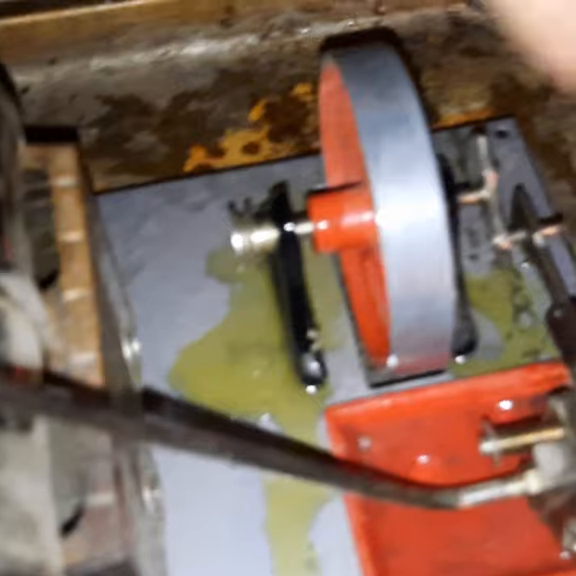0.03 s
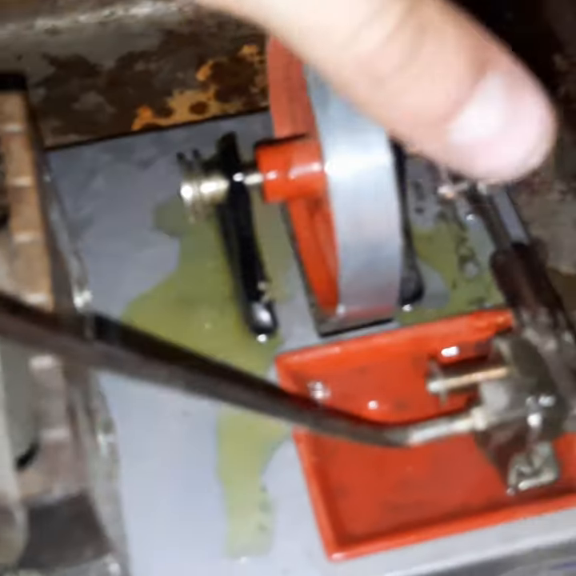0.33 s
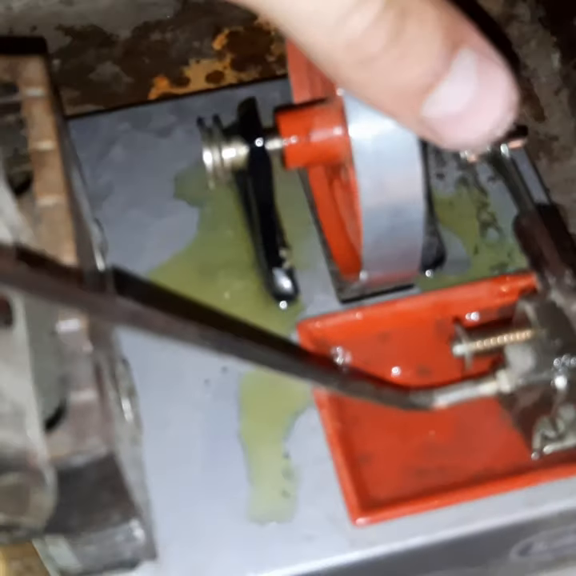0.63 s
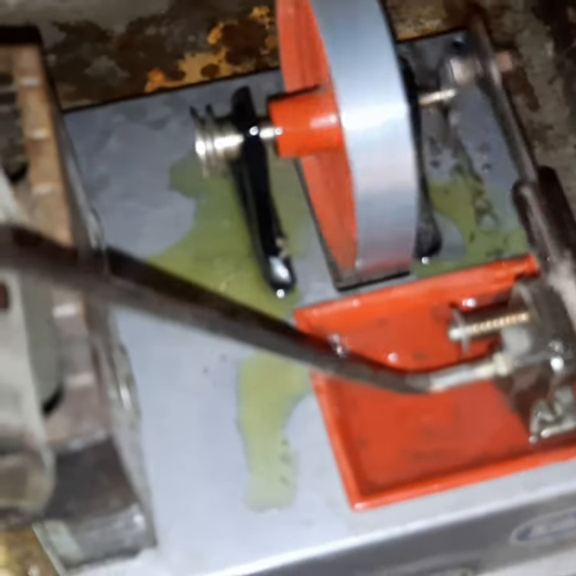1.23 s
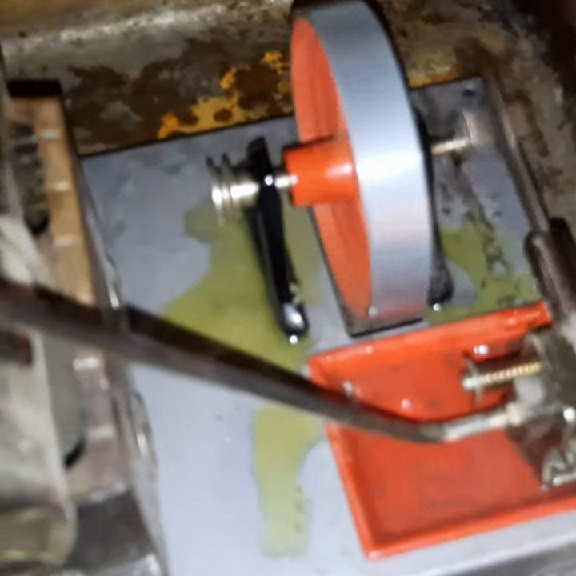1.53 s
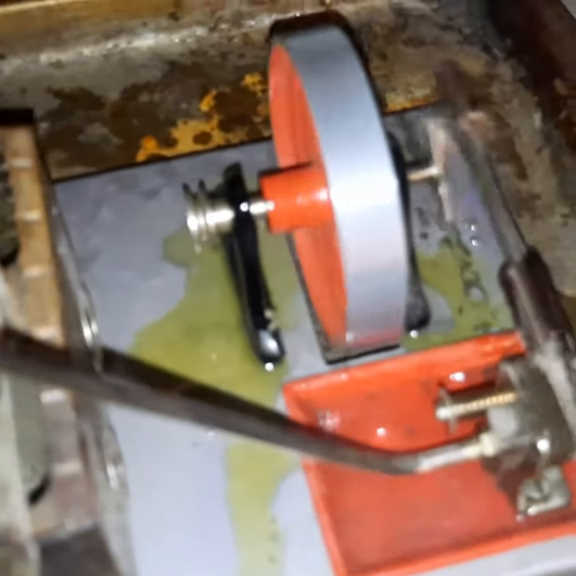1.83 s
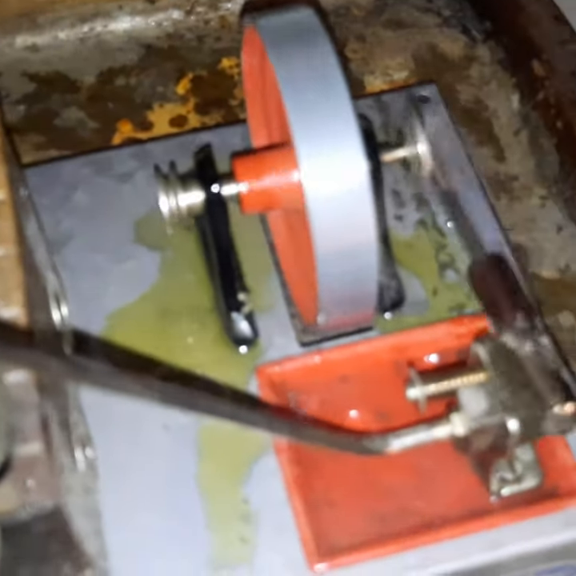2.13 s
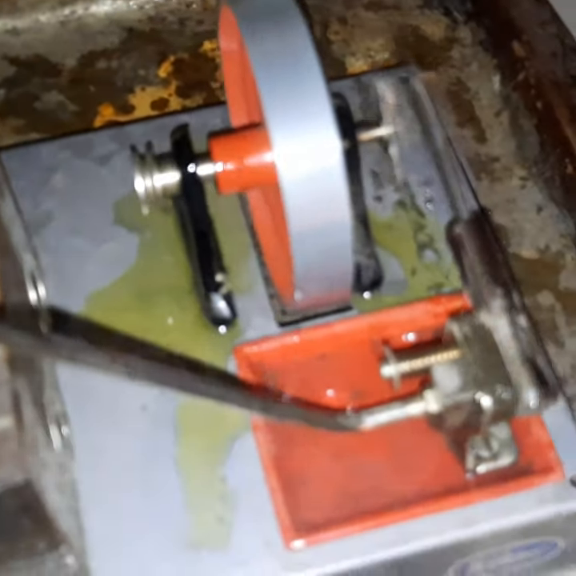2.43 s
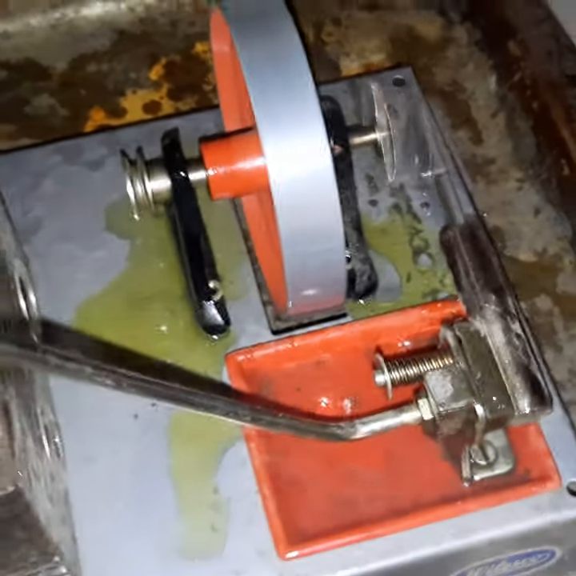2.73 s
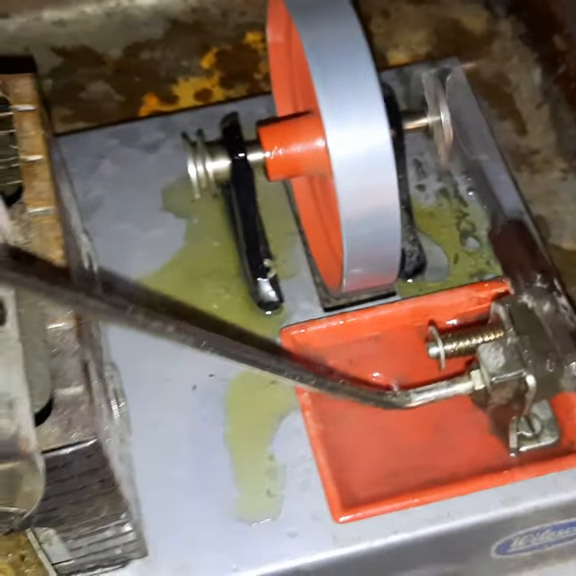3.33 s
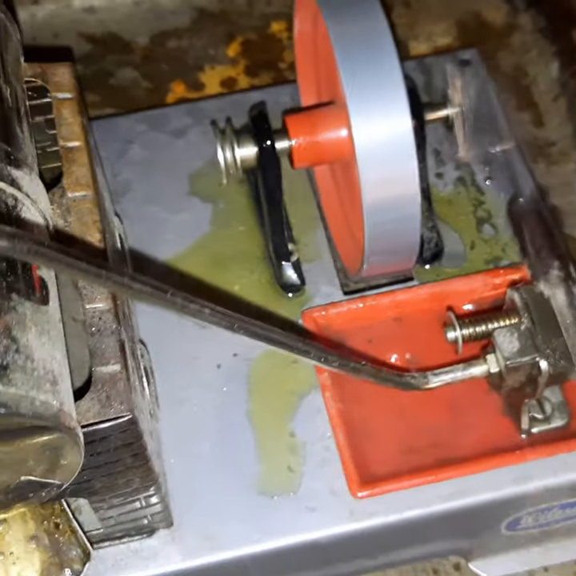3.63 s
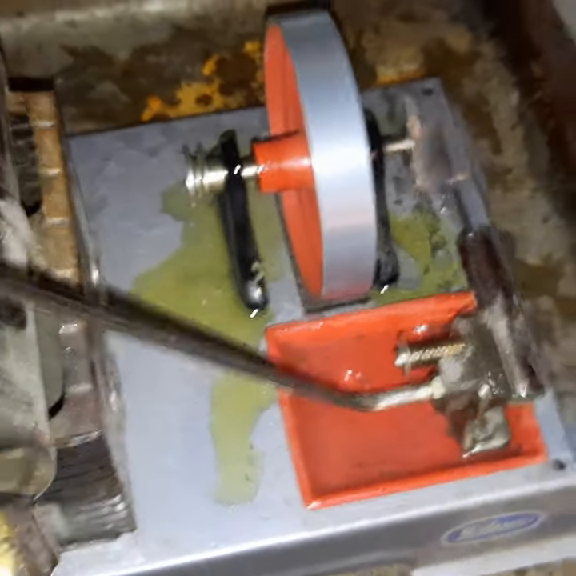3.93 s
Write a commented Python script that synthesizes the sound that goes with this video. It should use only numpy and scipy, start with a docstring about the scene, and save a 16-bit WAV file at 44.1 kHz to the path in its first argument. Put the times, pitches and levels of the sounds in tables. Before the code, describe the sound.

A small toy steam engine, heard close indoors, goes from quiet seeping steam to spitting chuffs and a clacking crank. The rhythm quickens steadily, ending in fast hissing puffs while its base rattles and drones against a metal basin.

```python
"""A faint hiss, a motor's hum and the tick of a finger, then a toy steam engine is flicked into motion,
close up in a metal basin, and races up to 34 turns a second. Every turn brings a wet chuff, a weak leak
of steam, a light tap and a bouncing clack of the loose crank, which thumps the base. Water squirts on
the first strokes. With speed the clack comes later in the turn and melts into the rattle and drone of
the shaking base."""
import sys
import numpy as np
from scipy import signal
from scipy.fft import rfft, irfft
from scipy.io import wavfile

SR = 44100
rng = np.random.default_rng(int(sys.argv[2]) if len(sys.argv) > 2 else 0)


def write(x):
    x = np.atleast_2d(x).T
    wavfile.write(sys.argv[1], SR, np.round(np.clip(x, -1, 1) * 32767).astype(np.int16))


N = 176400
RELEASE_S, PORT_OPEN_S = 1.2, 2.782  # the finger lets go; a moment when the crank is at angle zero

# run-up of the flywheel: time_s, turns_per_s
SPEED = [(1.2, 2.599), (1.45, 6.37), (1.7, 9.662), (2.0, 13.804), (2.4, 19.353), (2.8, 24.58),
         (3.2, 28.703), (3.6, 31.814), (4.0, 34.264)]
# steam at the peak of a puff: time_s, chuff_db, leak_db
PUFF_LEVELS = [(1.1, -66, -58), (1.22, -45, -49), (1.36, -28.5, -43), (1.47, -28, -32), (1.53, -21, -41),
               (1.65, -22.5, -50), (1.85, -21, -37), (2.3, -14.5, -37), (2.6, -15, -34), (2.8, -12.5, -29),
               (3.2, -14, -43), (3.7, -16.5, -45), (4.0, -15.5, -28)]
# colour of the chuff at low, high and full speed: freq_hz, level_db
SLOW_CHUFF = [(500, -35), (2000, -19.5), (5000, -9), (5800, 0), (6450, 1), (7300, 1.5), (7900, -10.5),
              (8300, 4), (8800, -17.5), (11000, -9.5), (13500, -14.5), (15600, -23)]
FAST_CHUFF = [(500, -21), (2000, -34), (4000, -13.5), (5600, -5.5), (6800, -3), (7300, 2), (7550, 8),
              (7800, 10), (8050, 4), (8450, -0.5), (8900, -13.5), (10300, -12.5), (12500, -8), (14000, -15),
              (15600, -18)]
RACING_CHUFF = [(500, -11), (2000, -1.5), (4000, -6.5), (5000, 0.5), (6500, -1), (8300, 4.5), (9000, -15),
                (10300, -5), (12500, -2), (14000, -7), (15600, -22)]
# speed at which each of those colours plays alone: turns_per_s
CHUFF_SPEEDS = [9, 23, 31.5]
# a faint tick of a finger touching the engine, then light taps of the crank: start_s, level_db
TICK_AND_TAPS = [(0.161, -50.5), (1.408, -35), (1.5545, -30.5), (1.6716, -26.5), (1.772, -26.5),
                 (1.8614, -27), (1.9434, -26.5), (2.0163, -24.5), (2.086, -21.5), (2.1509, -23),
                 (2.2112, -23), (2.269, -28), (2.3248, -25), (2.379, -28), (2.4292, -26), (2.4792, -27),
                 (2.5278, -30), (2.5763, -30), (2.618, -30), (2.664, -27), (2.7073, -31), (2.7508, -27),
                 (2.7904, -37)]
# clacks of the crank: start_s, ring_db, hardness (0-1), crack_db
CLACKS = [(1.4426, -33, 0.54, -37.5), (1.5812, -25, 0.27, -39), (1.695, -19, 0.2, -29),
          (1.7927, -18.5, 1, -26.5), (1.879, -19.5, 1, -27), (1.9596, -18, 0.94, -26.5),
          (2.0322, -18.5, 0.7, -26.5), (2.0998, -16, 0.8, -28.5), (2.1644, -21.5, 0.7, -27.5),
          (2.2251, -16, 0.95, -27), (2.2833, -18, 0.94, -29), (2.3399, -17.5, .8, -25.5),
          (2.392, -20, 0.55, -29), (2.4443, -20.5, 0.34, -27), (2.4938, -22.5, 0.05, -28),
          (2.5411, -22.5, 0, -27), (2.5867, -24, .25, -27), (2.6309, -25.5, 0.1, -31),
          (2.6762, -23, 0.4, -29), (2.7189, -17, 0.53, -31), (2.7607, -21, 0.7, -48),
          (2.8017, -22, 0.7, -29.5), (2.843, -23, 1, -29.5), (2.884, -23.5, 0.5, -29.5),
          (2.9222, -23.5, 0.9, -27), (2.9651, -23, 0.6, -34), (2.9995, -28, 0.8, -33),
          (3.0358, -22, 0.8, -30), (3.0767, -27, 0.9, -26), (3.1137, -29, 0.5, -27.5),
          (3.1449, -29, .7, -26), (3.1851, -32, 0.8, -20), (3.217, -26, 0.4, -29), (3.2927, -28, 1, -27),
          (3.3265, -24, 1, -28), (3.359, -19.5, 0.84, -26), (3.3944, -25.5, .8, -26),
          (3.424, -24, .7, -28.5)]
# a blow and its two bounces: delay_s, level_db
BOUNCES = [(0, 1), (.0024, -12.5), (.0056, -7.5)]
# ring of the crank and frame: pitch_hz, hard_blow_db, t60_s, soft_blow_db
FRAME_MODES = [(770, -23, 0.055, -25.5), (1022, -4, 0.02, -8), (1130, 0, 0.015, 1),
               (1240, -2.5, 0.017, -4.5), (1624, -0.5, 0.02, -8.5), (1760, 2.5, 0.02, -9.5),
               (1848, 3, 0.023, -35), (2030, -4, .021, -21), (2140, -8.5, 0.029, -32),
               (2725, -14, 0.016, -31), (3720, -15, 0.015, -36), (4420, -21, 0.021, -28)]
# colour of the crack on each clack: freq_hz, level_db
CRACK_COLOUR = [(400, 3), (1500, -1), (2700, 0), (3500, -3.5), (5000, 3.5), (6200, -6.5), (8200, -9),
                (9500, -17), (13000, -14.5), (15600, -39)]
# how long after the chuff the crank loads the base: time_s, lag_turns
CLACK_LAG = [(1.44, .45), (1.9, .462), (2.28, .482), (2.42, .525), (2.8, .53), (3.0, .63), (3.2, .74),
             (3.55, .91), (4.0, .95)]
# ring of the base in the basin: pitch_hz, level_db, t60_s
BASE_MODES = [(96.7, -16, 0.28), (121.8, 1, 0.2), (158.4, 0.5, 0.13), (202.3, -3.5, 0.093),
              (244, -14.5, 0.17), (313.2, 6, 0.097), (421, -11.5, 0.17), (463, -6.5, 0.094), (620, -8, 0.1)]
# mean levels of the shaking base: time_s, thump_db, rattle_db
SHAKE_LEVELS = [(1.1, -58, -67), (1.25, -50, -58), (1.45, -37.5, -52), (1.65, -34, -44), (1.85, -29, -41),
                (2.3, -29, -32), (2.7, -28, -39.5), (2.9, -29, -29.5), (3.1, -27.5, -28.5), (3.4, -42, -24),
                (3.58, -44, -26), (3.7, -44, -25.5), (4.0, -44, -23.5)]
# colour of the rattle: freq_hz, level_db
RATTLE_COLOUR = [(60, -8.5), (130, -2.5), (310, -1), (500, -4), (730, -3.5), (1150, 0.5), (1500, -1),
                 (1900, -1.5), (2600, -7), (3600, -13.5), (5000, -23.5), (8000, -30), (9500, -37),
                 (13000, -31), (15600, -19)]
# partials of the drone: cycles_per_turn
DRONE_MULTIPLES = [3, 4, 5, 6, 7, 10, 11, 14]
# swell of the drone: time_s, then one level_db for each partial
DRONE_LEVELS = [(2.5, -45, -45, -31, -53, -44, -63, -58, -56),
                (2.8, -54, -49, -26.5, -50, -38, -48, -37, -48),
                (3.02, -52, -43, -24.5, -33, -40, -31, -38.5, -42),
                (3.28, -49, -30.5, -27, -38, -28, -33, -35.5, -37.5),
                (3.55, -29, -31.5, -25, -36, -71, -28, -55, -38.5),
                (3.72, -32.5, -31.5, -37, -34.5, -40, -37, -46, -44),
                (4.0, -27, -28.5, -37, -48, -54, -49, -48, -50)]
# squirts of condensed water: start_s, length_s, start_hz, end_hz, level_db
SQUIRTS = [(1.209, 0.022, 6300, 6650, -43.5), (1.226, 0.054, 3880, 5230, -45.5),
           (1.235, .04, 13100, 14800, -48), (1.296, .022, 7000, 9100, -47), (1.455, 0.027, 5500, 8130, -43),
           (1.59, 0.023, 5880, 7970, -33.5)]
# groan of the bearing at low speed: time_s, level_db
GROAN_LEVELS = [(.9, -83), (1.05, -49.5), (1.16, -38), (1.28, -56), (1.45, -44), (1.7, -59), (2.0, -65)]
# seeping steam and rubbing shaft: time_s, hiss_db, rub_db
HISS_RUB_LEVELS = [(.1, -55, -55.5), (.7, -55.5, -54), (.95, -51, -45.5), (1.15, -48.5, -42.5),
                   (1.3, -47, -37.5), (1.8, -40.5, -33), (2.6, -37, -30.5), (4.0, -29.5, -44)]
# colours of shaft, seeping steam, sizzling drops and room: freq_hz, level_db
RUB_COLOUR = [(45, -53.5), (58, -5), (85, -10.5), (125, 6), (200, -12.5), (290, 0), (380, -6.5), (550, -23),
              (1000, -11.5), (1600, -31.5), (5000, -45)]
HISS_COLOUR = [(1000, 4), (2500, 0), (4800, -0.5), (6100, 2), (7300, -4), (8000, -0.5), (9800, -11),
               (13200, -4), (15600, -17)]
SIZZLE_COLOUR = [(9500, -25), (12700, 2), (15000, -17)]
ROOM_COLOUR = [(40, 9), (60, -8), (85, -2.5), (150, -2), (190, -8), (290, -0.5), (370, -9.5), (480, -12),
               (600, -21.5), (850, -8.5), (1250, -35), (3000, -28), (8000, -58)]
# hum of the motor: harmonic_number, level_db
HUM_PARTIALS = [(1, -56.5), (2, -83), (5, -57.5), (6, -60.5), (14, -81), (15, -63), (16, -63.5), (17, -66),
                (18, -68.5), (19, -64)]
# stereo tilt of the microphone: freq_hz, left_minus_right_db
BALANCE = [(60, 2.5), (300, 3.5), (700, 4.5), (1300, 1.5), (2400, 3.5), (4400, -0.5), (5600, -0.5),
           (6500, -6.5), (7700, -3), (9000, 4.5), (12500, 8), (16000, 13.5)]


def steam(t, turns, rise_turns=.044, decay_turns=.07, spit_db=4, scatter_db=.86):
    """A spitting chuff as the port opens and a leak on the other stroke, changing colour with speed."""
    def past(place):
        return (turns - place + .5) % 1 - .5

    opened = past(-.02)  # the chuff peaks just ahead of angle zero
    chuff = np.exp(np.where(opened < 0, -.5 * (opened / rise_turns) ** 2, -opened / decay_turns))
    leak = np.exp(-.5 * (past(.637) / .056) ** 2)  # a soft swell later in the turn
    spit = undb(spit_db * np.repeat(rng.standard_normal(N // 32 + 1), 32)[:N])
    jet = rng.standard_normal(N) * spit / np.sqrt(np.mean(spit ** 2))
    stroke = np.round(turns - np.floor(turns[0])).astype(int)
    accent_db = scatter_db * rng.standard_normal(N // 100)[stroke]
    puffs = chuff * undb(curve(PUFF_LEVELS, t) + accent_db) + leak * undb(curve(PUFF_LEVELS, t, 2))
    flow = jet * (t > RELEASE_S) * puffs
    shares = (np.interp(curve(SPEED, t), CHUFF_SPEEDS, row) for row in np.eye(3))
    colours = (SLOW_CHUFF, FAST_CHUFF, RACING_CHUFF)
    return sum(through(flow * share, unit(response(colour))) for share, colour in zip(shares, colours))


def finger_and_crank(t, crack_decay_s=.0033):
    """A finger ticks the frame, then the loose crank taps and clacks; hard hits ring higher modes."""
    times, ring_db, hardness, crack_db = np.array(CLACKS).T
    light_hits = bouncing(*np.array(TICK_AND_TAPS).T)
    clack = bouncing(times, ring_db)
    hard = np.interp(t, times, hardness)
    fade = np.exp(-np.arange(SR // 30) / SR / crack_decay_s)
    crack_power = np.abs(through(bouncing(times, crack_db) ** 2, fade / fade.sum()))
    crack = np.sqrt(crack_power) * noise(CRACK_COLOUR)
    bright = ring([(hz, db, t60) for hz, db, t60, _ in FRAME_MODES])
    dull = ring([(hz, db, t60) for hz, _, t60, db in FRAME_MODES])
    return crack + through(clack * hard, bright) + through(light_hits + clack * (1 - hard), dull)


def bouncing(times, db, timing_scatter=.151, scatter_db=.38):
    """Each blow is followed by two uneven bounces."""
    out = 0
    for delay, bounce_db in BOUNCES:
        late, hard = rng.standard_normal((len(times), 2)).T
        landings = times + delay * (1 + timing_scatter * late)
        out += knocks(landings, db + bounce_db + scatter_db * hard)
    return out


def thumps(delay_s=.00719, softness_s=.00086):
    """Each clack gives the base a cushioned push that rings its low modes."""
    times = np.array(CLACKS)[:, 0]
    push = blows(times + delay_s, curve(SHAKE_LEVELS, times))
    push += knocks(np.array([1.24]), db=-34)  # the base settles as the finger lets go
    cushion = np.exp(-np.arange(SR // 50) / SR / softness_s)
    return through(push, unit(signal.fftconvolve(ring(BASE_MODES), cushion)))


def rattle(t, clack_turns, contacts_per_s=2500, scatter_db=4.5, swing_db=2, lag_turns=.12):
    """The base chatters against the basin, surging just after the crank loads it."""
    contacts = (rng.random(N) < contacts_per_s / SR) * rng.choice([-1, 1], N)
    contacts = contacts * undb(scatter_db * rng.standard_normal(N))
    chatter = contacts / np.std(contacts) + undb(-3) * buzz(clack_turns)
    surge_db = swing_db * np.cos(2 * np.pi * (clack_turns - lag_turns))
    return through(chatter * undb(curve(SHAKE_LEVELS, t, 2) + surge_db), unit(response(RATTLE_COLOUR)))


def buzz(clack_turns, count=24, jitter_s=.00008):
    """Some contacts of the rattle recur at the same angles on every turn."""
    out = 0
    for angle in (np.arange(count) + rng.random(count)) / count:
        turns = clack_turns - angle
        times = np.interp(np.arange(np.ceil(turns[0]), turns[-1]), turns, np.arange(N) / SR)
        out += rng.choice([-1, 1]) * blows(times + jitter_s * rng.standard_normal(len(times)), 0)
    return out / np.sqrt(count)


def drone(t, clack_turns, fade_in_s=2):
    """The unbalanced flywheel rocks the base, which drones at multiples of its speed."""
    out = 0
    for column, multiple in enumerate(DRONE_MULTIPLES, 1):
        partial = np.sin(2 * np.pi * (multiple * clack_turns + rng.random()))
        out += undb(curve(DRONE_LEVELS, t, column)) * partial
    return np.clip((t - RELEASE_S) / fade_in_s, 0, 1) * np.sqrt(2) * out


def squirts(t, half_width_hz=670):
    """Water leaves the cold cylinder in narrow hisses that glide upward."""
    fizz = signal.sosfilt(signal.butter(2, half_width_hz, fs=SR, output="sos"), rng.standard_normal(N))
    out = 0
    for start, length, low, high, db in SQUIRTS:
        progress = np.clip((t - start) / length, 0, 1)
        glide = np.sin(2 * np.pi * np.cumsum(low + (high - low) * progress) / SR)
        out += undb(db) * np.sin(np.pi * progress) * glide
    return out * np.sqrt(2) * fizz / np.std(fizz)


def shaft(t, groan_hz=365, t60_s=.14):
    """The shaft rubs with a low rumble, and its bearing groans at low speed."""
    groan = through(rng.standard_normal(N), ring([(groan_hz, 0, t60_s)]))
    rub = noise(RUB_COLOUR)
    return groan * undb(curve(GROAN_LEVELS, t)) + rub * undb(curve(HISS_RUB_LEVELS, t, 2))


def seep(t, sizzle_db=-58.5, drying_db_per_s=26):
    """Steam seeps from the valve face in a wide hiss; drops sizzle on the hot valve and dry off."""
    hiss = np.array([noise(HISS_COLOUR), noise(HISS_COLOUR)])
    sizzle = np.array([noise(SIZZLE_COLOUR), noise(SIZZLE_COLOUR)])
    return hiss * undb(curve(HISS_RUB_LEVELS, t)) + sizzle * undb(sizzle_db - drying_db_per_s * t)


def room(t, hum_hz=57.9, floor_db=-45):
    """A motor hums over a low bed of room tone."""
    hum = sum(undb(db) * np.sin(2 * np.pi * (k * hum_hz * t + rng.random())) for k, db in HUM_PARTIALS)
    return np.sqrt(2) * hum + undb(floor_db) * noise(ROOM_COLOUR)


def basin(x, right_lag_s=.0003, basin_t60_s=.018, room_t60_s=.22, room_db=-15, sway_s=.12):
    """Direct sound arrives on the left first; basin and room reflections shift as the hand sways."""
    t = np.arange(SR // 4) / SR
    low_cut = signal.butter(2, 850, "high", fs=SR, output="sos")  # keeps the bass dry
    hop = int(sway_s * SR)
    padded, window = np.pad(x, (hop, 2 * hop)), np.hanning(2 * hop)
    out = np.zeros((2, len(padded) + len(t)))
    for side, lag in enumerate((0, right_lag_s)):
        for start in range(0, N + hop, hop):
            near, far = (unit(rng.standard_normal(len(t)) * decay(t, t60) * (t > .0006))
                         for t60 in (basin_t60_s, room_t60_s))
            ir = signal.sosfilt(low_cut, near + undb(room_db) * far)
            ir[int(lag * SR)] += 1  # the direct sound
            piece = signal.fftconvolve(padded[start:start + 2 * hop] * window, even(ir))
            out[side, start:start + len(piece)] += piece
    return out[:, hop:hop + N]


def even(ir, amount=.62):
    """Soften the peaks and notches that reflections leave in a response."""
    spectrum = rfft(np.pad(ir, (256, 0)), 16384)
    return unit(irfft(spectrum / np.abs(spectrum) ** amount)[256:256 + len(ir)])


def blows(times, db):
    """Impulses whose mean level follows db at any speed, once the flywheel is free."""
    x = np.zeros(N)
    at = (times * SR).astype(int)
    keep = (times > RELEASE_S) & (at < N)
    x[at[keep]] = (undb(db) * np.sqrt(SR / curve(SPEED, times)))[keep]
    return x


def knocks(times, db, knock_s=.01):
    """Impulses with the given level over the length of a knock."""
    x = np.zeros(N)
    x[np.clip((times * SR).astype(int), 0, N - 1)] = undb(db) * np.sqrt(SR * knock_s)
    return x


def ring(modes):
    """Response of a struck body with modes of pitch_hz, level_db, t60_s."""
    t = np.arange(SR // 2) / SR
    return unit(sum((-1) ** k * undb(db) * np.sin(2 * np.pi * hz * t) * decay(t, t60)
                    for k, (hz, db, t60) in enumerate(modes)))


def noise(colour):
    """Coloured noise of unit level."""
    return through(rng.standard_normal(N), unit(response(colour)))


def response(colour, size=8192):
    """Minimum-phase EQ through points of freq_hz, level_db."""
    hz, db = np.array(colour, float).T
    f = np.maximum(np.fft.rfftfreq(size, 1 / SR), 1)
    cepstrum = irfft(np.log(undb(np.interp(np.log(f), np.log(hz), db))))
    cepstrum[1:size // 2] *= 2
    cepstrum[size // 2 + 1:] = 0
    return irfft(np.exp(rfft(cepstrum)))


def through(x, ir):
    """Pass a sound through a response."""
    return signal.fftconvolve(x, ir)[:N]


def curve(table, t, column=1):
    """One column of a table at the given times."""
    rows = np.array(table, float)
    return np.interp(t, rows[:, 0], rows[:, column])


def decay(t, t60_s):
    """A tail that falls 60 dB in t60_s."""
    return np.exp(-np.log(1000) * t / t60_s)


def unit(ir):
    """Scale a response to unit energy."""
    return ir / np.sqrt(np.sum(ir ** 2))


def undb(db):
    """Decibels to gain."""
    return 10 ** (np.asarray(db) / 20)


def scene():
    """The crank angle times the steam, rattle and drone; taps and clacks fall between the chuffs."""
    t = np.arange(N) / SR
    turns = np.cumsum(curve(SPEED, t)) / SR
    turns -= np.interp(PORT_OPEN_S, t, turns)
    clack_turns = turns - curve(CLACK_LAG, t)
    engine = steam(t, turns) + squirts(t) + finger_and_crank(t)
    body = thumps() + rattle(t, clack_turns) + shaft(t) + drone(t, clack_turns)
    return basin(engine + body + room(t)) + seep(t)


def record(dry, start_s=.067, low_cut_hz=51.6, high_cut_hz=15800):
    """A stereo microphone, each side with its own colour, snaps on; deep bass and extreme top are cut."""
    low_cut = signal.butter(6, low_cut_hz, "high", fs=SR, output="sos")
    high_cut = signal.ellip(10, .2, 80, high_cut_hz, fs=SR, output="sos")
    fade_in = np.clip((np.arange(N) / SR - start_s) / .004, 0, 1)
    sides = np.array([through(x, response([(hz, side * db / 2) for hz, db in BALANCE]))
                      for x, side in zip(dry, (1, -1))])
    return signal.sosfilt(high_cut, signal.sosfilt(low_cut, sides * fade_in))


dry = scene()
out = record(dry)
write(out)
```